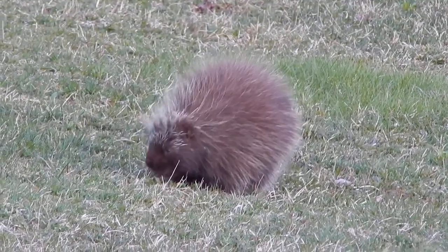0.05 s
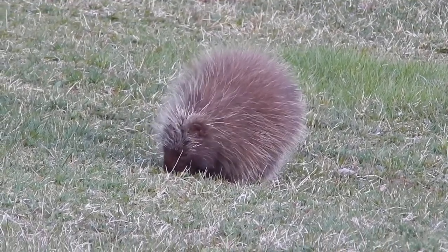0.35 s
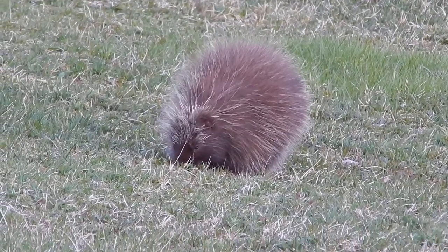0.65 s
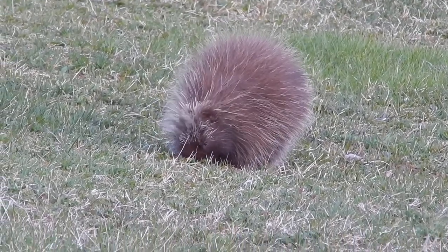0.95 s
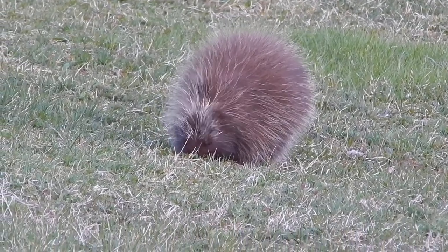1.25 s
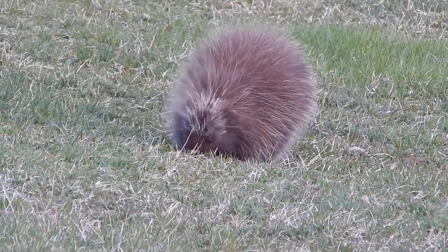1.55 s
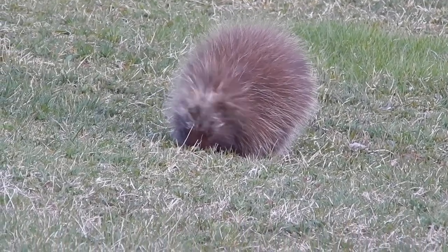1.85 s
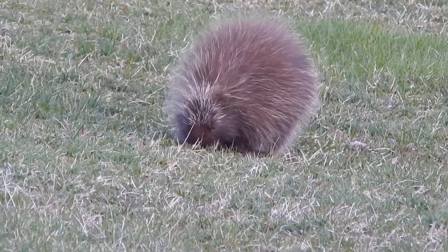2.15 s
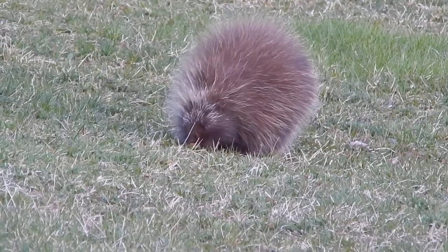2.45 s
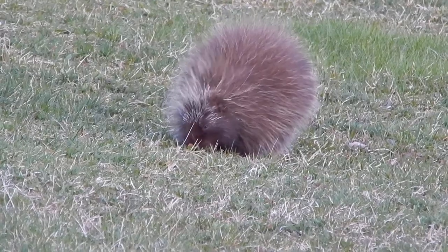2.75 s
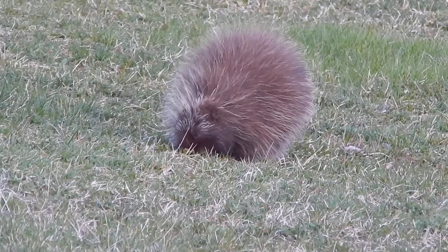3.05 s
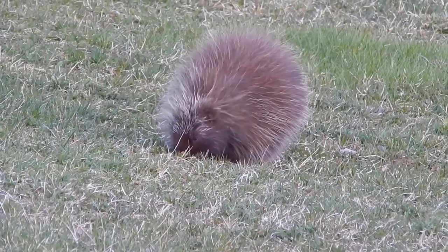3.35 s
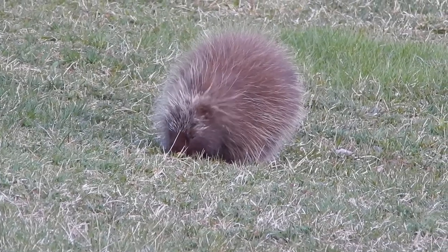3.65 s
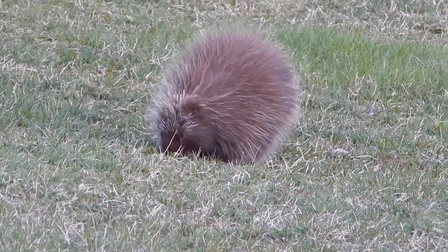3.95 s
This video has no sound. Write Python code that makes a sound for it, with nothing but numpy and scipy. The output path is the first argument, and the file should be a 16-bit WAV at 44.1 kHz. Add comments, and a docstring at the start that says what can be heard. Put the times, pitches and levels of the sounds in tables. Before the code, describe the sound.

Wind buffets a camera microphone with low rumble and thumps, hardest on the right at first, then easing into lighter puffs on the left. Behind it lies a quiet lawn with faint hiss and barely audible distant peeps.

```python
"""Wind thumps and rumbles on a camera microphone, hardest on the right at first: gusts buffet each of
its two ports on their own, and single eddies land as harder knocks. Behind them lies a quiet lawn:
distant outdoor air, faint mains hum and microphone hiss, with a far rush swelling once near the end.
Barely there are a few far peeps, touches of high fizz, one tiny tick and two thin, very high chirps,
perhaps an insect."""
import sys
import numpy as np
from scipy.fft import rfft, irfft, next_fast_len
from scipy.io import wavfile
from scipy.ndimage import uniform_filter1d, map_coordinates

SR = 44100
rng = np.random.default_rng(int(sys.argv[2]) if len(sys.argv) > 2 else 0)


def log_audio(samples):
    """Write samples as a 16-bit WAV file to the path given in sys.argv[1]."""
    # one column per channel
    frames = np.atleast_2d(samples).T
    # limit to full scale, then quantise
    limited = np.clip(frames, -1, 1)
    pcm = np.round(limited * 32767).astype(np.int16)
    wavfile.write(sys.argv[1], SR, pcm)


N = 176400

# Stereo image of distant air. Each row: frequency in Hz, left-right likeness (1 is mono).
AIR_LIKENESS = [(60, 0.56), (200, 0.97), (400, 0.85), (700, 0.71), (1300, 0.47), (2400, 0.089)]


def amp(db):
    """Decibels to gain."""
    return 10 ** (np.asarray(db) / 20)


def unit(x):
    """Scale to rms 1."""
    return x / np.sqrt(np.mean(x ** 2) + 1e-20)


def clock():
    """Each sample's time in seconds."""
    return np.arange(N) / SR


def along(points, hz):
    """Read (Hz, value) points on a log frequency axis."""
    freqs, values = np.transpose(points)
    return np.interp(np.log(hz + 1), np.log(freqs + 1), values)


def wobble(rate):
    """A smooth random drift, rate knots a second."""
    return map_coordinates(rng.standard_normal(int(N * rate / SR) + 4), [clock() * rate])


def envelope(start, rise, hold, fall):
    """Linear attack, hold and release, in seconds."""
    age = clock() - start
    return np.clip(np.minimum(age / rise, (rise + hold + fall - age) / fall), 0, 1)


def filtered(x, response):
    """Equalise x with a gain curve over Hz."""
    size = next_fast_len(N + SR // 2)
    return irfft(rfft(x, size) * response(np.fft.rfftfreq(size, 1 / SR)), size)[..., :N]


def noise(colour, likeness=((100, 0),)):
    """Coloured stereo noise of rms 1 with a given left-right likeness."""
    def mid_side_gains(hz):
        spread = np.arccos(np.clip(along(likeness, hz), -1, 1)) / 2
        return amp(along(colour, hz)) * [np.cos(spread), np.sin(spread)]
    mid, side = filtered(rng.standard_normal((2, N)), mid_side_gains)
    return unit(np.array([mid + side, mid - side]))


def background():
    """A gently wavering bed of distant air, mains hum and microphone hiss."""
    # Tone of the air and of the hiss. Each row: frequency in Hz, relative level in dB.
    air_colour = [(30, -7), (100, 0.5), (200, -3), (300, -6), (400, -8), (600, -12), (850, -10),
                  (1150, -17), (1290, -13), (1500, -21.5), (2200, -27), (4000, -39.5), (9000, -57)]
    hiss_colour = [(200, -2), (1500, 1), (2300, 1.5), (2500, -1), (2780, 4), (3200, -1), (4500, -3.5),
                   (5500, -5.5), (8000, -8.5), (9600, -9), (12000, -13), (15500, -16)]
    # Mains harmonics. Each row: frequency in Hz, rms level in dB.
    harmonics = [(120, -63.5), (240, -69.5), (360, -70)]
    air = amp(-56.5 + 0.48 * wobble(3.63)) * noise(air_colour, AIR_LIKENESS)
    hum = np.zeros(N)
    for hz, db in harmonics:
        peak = np.sqrt(2) * amp(db + 0.99 * wobble(5.4))
        hum += peak * np.sin(2 * np.pi * hz * clock() + 0.31 * wobble(4.05))
    hiss = amp(-67 + 0.22 * wobble(15)) * noise(hiss_colour)
    return air + hum + hiss * amp([[-.55], [.55]])  # the hiss leans right


def far_rush():
    """A soft, low rush swells and fades in the distance."""
    # Tone of the rush. Each row: frequency in Hz, relative level in dB.
    colour = [(150, -36), (280, -6.5), (370, 2.5), (520, -3), (700, -14), (1200, -19.5), (2800, -22),
              (6000, -50)]
    return amp(-59) * envelope(2.955, rise=.22, hold=.23, fall=.28) * noise(colour, AIR_LIKENESS)


def rustles():
    """Brief, faint touches of high fizz."""
    # The rustles. Each row: start in seconds, length in seconds, level in dB.
    touches = [(0, .5, -78.5), (2.276, 0.21, -78), (2.72, .1, -74)]
    # Tone of the fizz. Each row: frequency in Hz, relative level in dB.
    colour = [(3000, -27), (5500, -4), (7000, -4), (9300, 5.5), (11000, -3), (12200, -5), (13300, -3),
              (15500, -15)]
    level = sum(amp(db) * envelope(start, length / 3, length / 3, length / 3)
                for start, length, db in touches)
    return level * noise(colour)


def tick():
    """One tiny burst of noise that dies at once."""
    # Tone of the tick. Each row: frequency in Hz, relative level in dB.
    colour = [(100, 22), (400, 17), (1000, 8), (2000, -12), (6500, -18), (7800, -5), (9600, -3),
              (11000, -20), (15000, -30)]
    start_s, t60_s = 1.9145, .018
    age = clock() - start_s
    decay = (age > 0) * amp(-45.5 - 60 * np.abs(age) / t60_s)
    return decay * noise(colour, likeness=[(1000, 0.77)])


def peeps():
    """Far, shrill peeps, perhaps frogs, smeared by distance into a narrow band."""
    # The peeps. Each row: end of the attack in seconds, level in dB.
    calls = [(.02, -72), (.08, -77), (.25, -78), (0.521, -73.5), (.62, -74.5), (1.45, -74)]
    # Their band. Each row: frequency in Hz, relative level in dB.
    colour = [(1500, -56), (2500, -25.5), (2700, 2.5), (2930, 1), (3150, -14.5), (5000, -62.5)]
    rise = .03
    level = sum(amp(db) * envelope(time - rise, rise, hold=.032, fall=.05) for time, db in calls)
    return level * noise(colour, likeness=[(2800, 0.33)])


def chirps():
    """Two thin, wavering notes, each with a weaker partial below."""
    # Each row: start and length in seconds, pitch in Hz, levels of the note and its lower partial in dB.
    notes = [(2.425, .08, 13610, -82.5, -96), (2.572, 0.083, 13680, -82.5, -85)]
    lower_ratio, waver, edge_s = .752, .006, .015
    out = np.zeros(N)
    for start, length, hz, db, lower_db in notes:
        phase = 2 * np.pi * np.cumsum(hz * (1 + waver * wobble(350))) / SR
        note = amp(db) * np.sin(phase) + amp(lower_db) * np.sin(lower_ratio * phase)
        out += np.sqrt(2) * note * envelope(start, edge_s, length - 2 * edge_s, edge_s)
    return out


def thumps():
    """An eddy crossing a port pulls and then pushes once."""
    # Each row: centre in seconds, level in dB, half width in seconds, port (0 left, 1 right).
    hits = [(.003, -7.5, 0.0047, 1), (.184, -14, 0.0028, 1), (.282, -13, 0.00072, 1), (.364, -5, 0.0019, 1),
            (.416, -9.5, 0.0017, 1), (1.016, -13.5, 0.0026, 0), (1.376, -17, 0.0022, 0),
            (1.521, -20.5, 0.0028, 0), (3.708, -19, 0.0045, 0), (3.889, -23, 0.0041, 0)]
    out = np.zeros((2, N))
    for centre, db, half_width, port in hits:
        crossing = (clock() - centre) / half_width
        out[round(port)] += amp(db) * 2 * crossing / (1 + crossing ** 2 / 3) ** 3
    return out


def turbulence(colour, window=1800):
    """Unrelated rumble at each port, its level evened out over window samples."""
    rumble = noise(colour)
    power = uniform_filter1d(uniform_filter1d(rumble ** 2, window), window)
    return unit(rumble / np.sqrt(np.abs(power) + 1e-9))


def wind():
    """Each port has its own gusts; the harder it blows, the smaller the eddies and higher the rumble."""
    # Gust strength at each port. Each row: time in seconds, level in dB.
    left_gusts = [(0, -28.5), (.12, -31), (.2, -43.5), (.4, -42), (.46, -17.5), (.55, -50), (.91, -53.5),
                  (.98, -31.5), (1.12, -29.5), (1.2, -47.5), (1.33, -44.5), (1.53, -36), (1.87, -46),
                  (1.98, -37), (2.12, -48), (2.21, -37.5), (2.29, -58), (2.38, -41.5), (2.6, -55.5),
                  (2.72, -45), (2.83, -39), (2.97, -48.5), (3.42, -51), (3.6, -41.5), (3.7, -32.5),
                  (3.77, -37), (3.89, -35), (4, -34.5)]
    right_gusts = [(0, -13), (.08, -26.5), (.14, -31), (.21, -30), (.26, -14), (.31, -17), (.338, -30),
                   (.37, -18), (.45, -20), (.57, -41), (.64, -35), (.76, -53), (.91, -49), (0.964, -31.5),
                   (1.06, -53), (1.109, -29.5), (1.19, -35), (1.279, -26.5), (1.41, -39.5), (1.48, -39),
                   (1.75, -58.5), (2.25, -53), (2.36, -48), (2.87, -42.5), (3.15, -61), (3.83, -63),
                   (3.93, -44), (4, -67)]
    # Puffs riding the gusts. Each row: centre in seconds, boost in dB, port (0 left, 1 right).
    puffs = [(.055, 2, 1), (0.1, 5, 1), (.315, 2, 1), (0.523, 8.5, 1), (1.461, 9.5, 1), (1.565, 6, 1),
             (1.471, 11, 0), (1.62, 9.5, 0), (1.79, 6.5, 0), (2.176, 3, 0), (2.655, 12.5, 0), (2.779, 8, 0),
             (2.828, 4.5, 0), (2.886, 10, 0), (3.27, 10, 0), (3.971, 5, 0)]
    # Tone of the rumble at three strengths. Each row: frequency in Hz, relative level in dB.
    gentle = [(10, -18), (25, -5), (45, 3.5), (62, -2), (85, -7), (120, -13.5), (170, -19.5), (260, -37),
              (500, -60), (2000, -120)]
    brisk = [(10, -8), (25, -8.5), (50, 3.5), (90, 2), (150, -11.5), (210, -23), (300, -38), (500, -54.5),
             (2000, -110)]
    strong = [(10, -18.5), (30, -10), (55, 4.5), (85, 5.5), (160, 0.5), (220, -10.5), (310, -26),
              (450, -32.5), (800, -51), (2000, -100)]
    strengths_db = [-38.5, -29.5, -18.5]  # wind levels at which each tone takes over
    flutter_db, puff_half_s = 0.9, 0.02
    level_db = np.array([np.interp(clock(), *np.transpose(gusts)) + flutter_db * wobble(rate=26)
                         for gusts in (left_gusts, right_gusts)])
    for centre, db, port in puffs:
        level_db[round(port)] += db * np.exp(-((clock() - centre) / puff_half_s) ** 2)
    rumble = np.zeros((2, N))
    for colour, weights in zip((gentle, brisk, strong), np.eye(3)):
        share = np.interp(level_db, strengths_db, weights)
        rumble += np.sqrt(share) * turbulence(colour)  # equal-power crossfade
    return amp(level_db) * rumble


def scene():
    """Wind on the microphone over the quiet lawn."""
    return wind() + thumps() + background() + far_rush() + peeps() + rustles() + tick() + chirps()


def record(dry):
    """The sound fades in and out over two milliseconds, and the camera keeps nothing above its band limit."""
    fade_s, top_hz = .002, 15720
    faded = dry * envelope(0, fade_s, N / SR - 2 * fade_s, fade_s)
    return filtered(faded, lambda hz: hz < top_hz)


dry = scene()
out = record(dry)
log_audio(out)
```